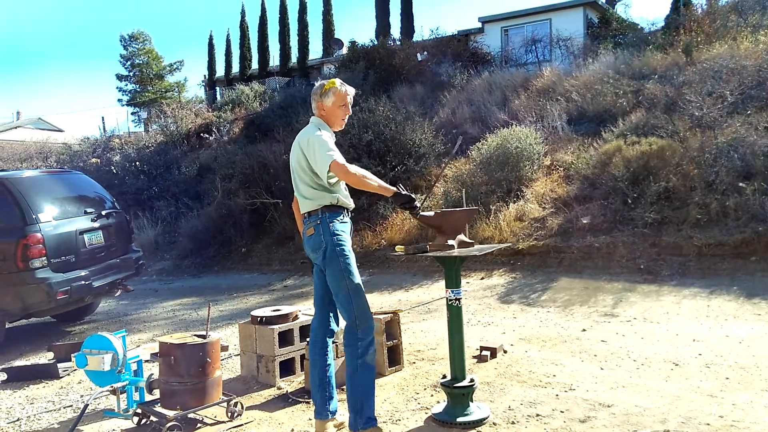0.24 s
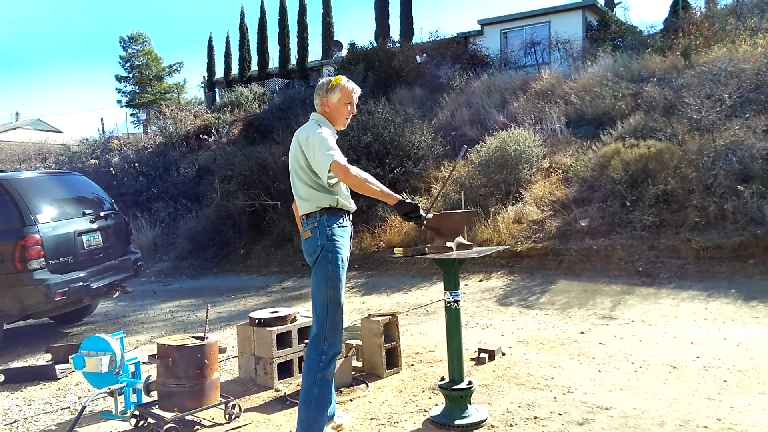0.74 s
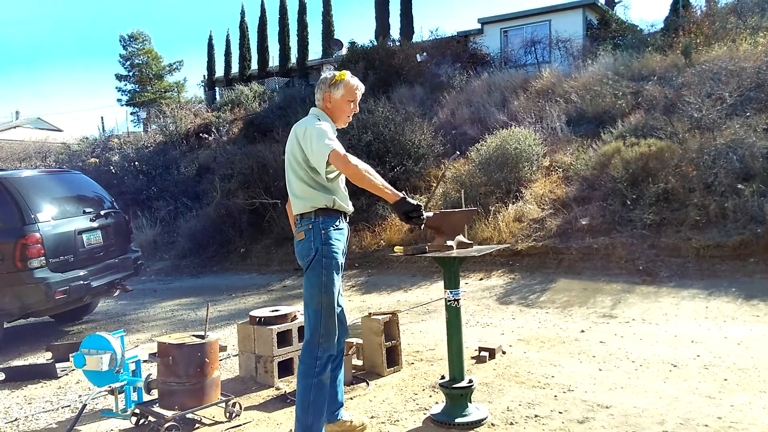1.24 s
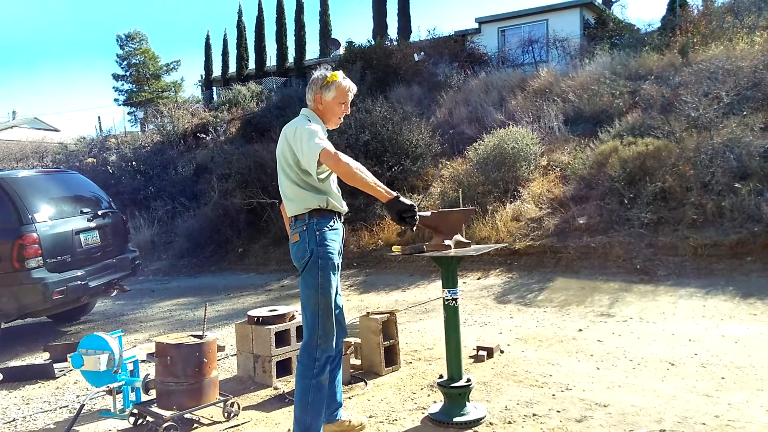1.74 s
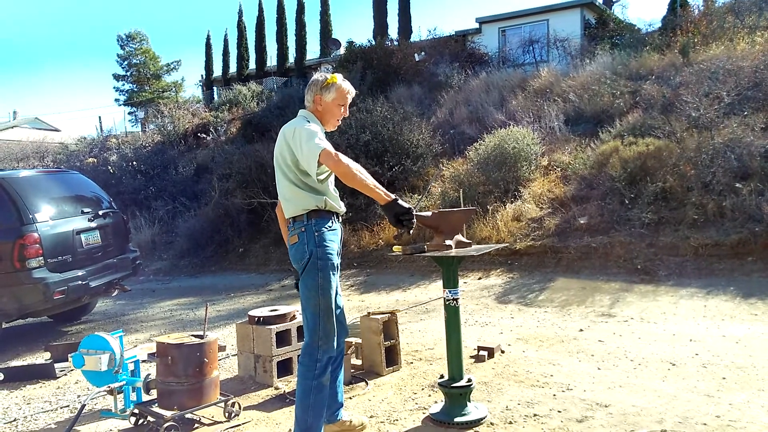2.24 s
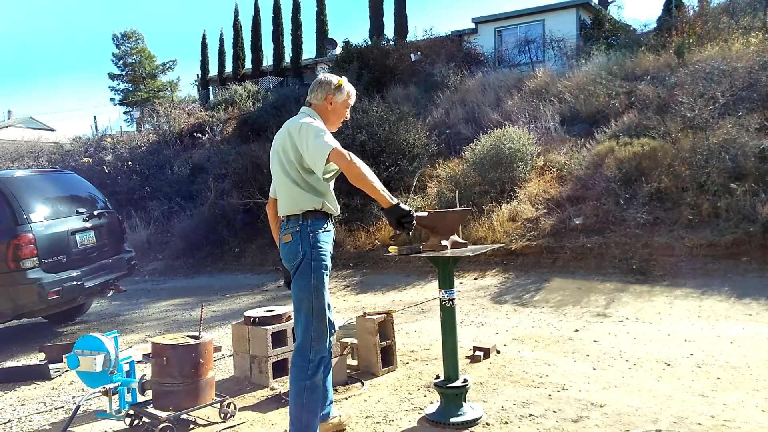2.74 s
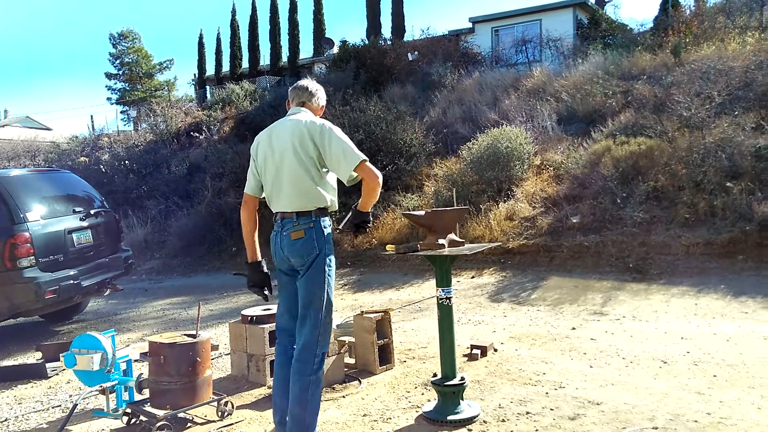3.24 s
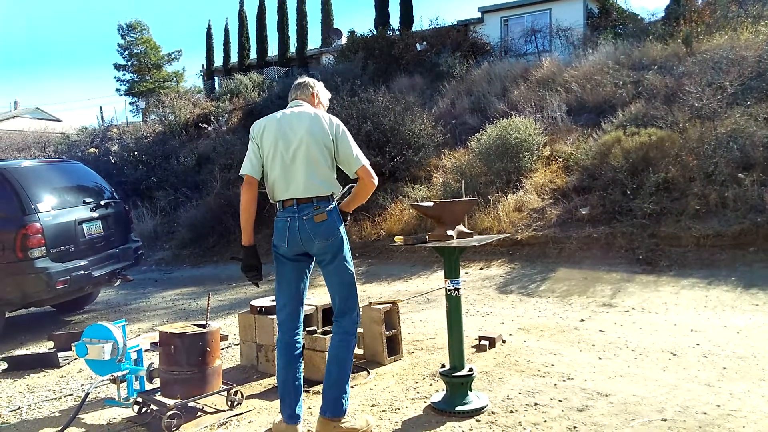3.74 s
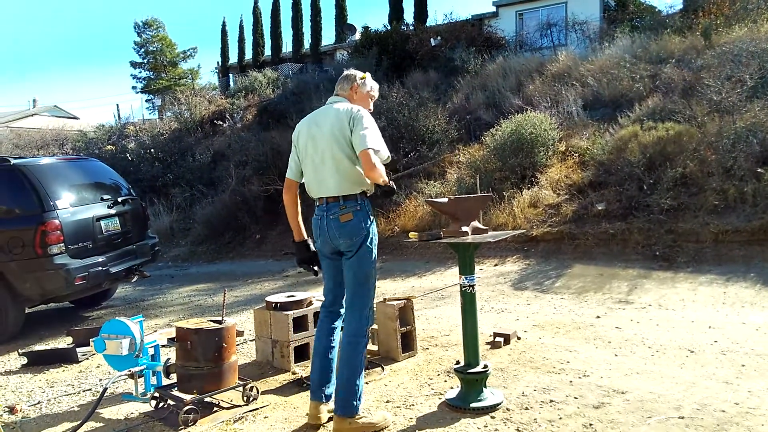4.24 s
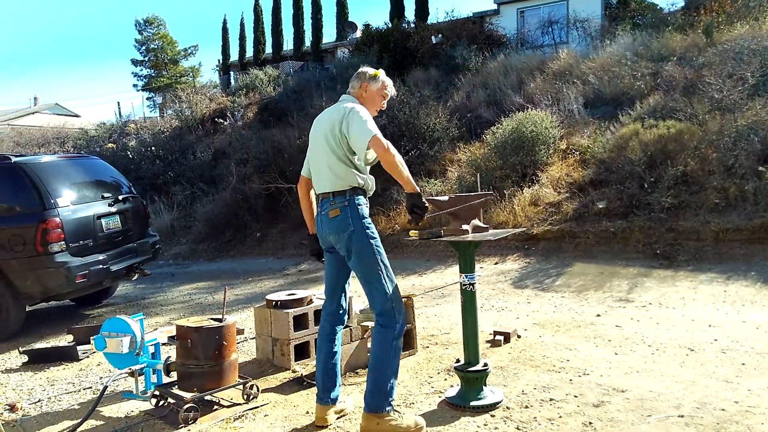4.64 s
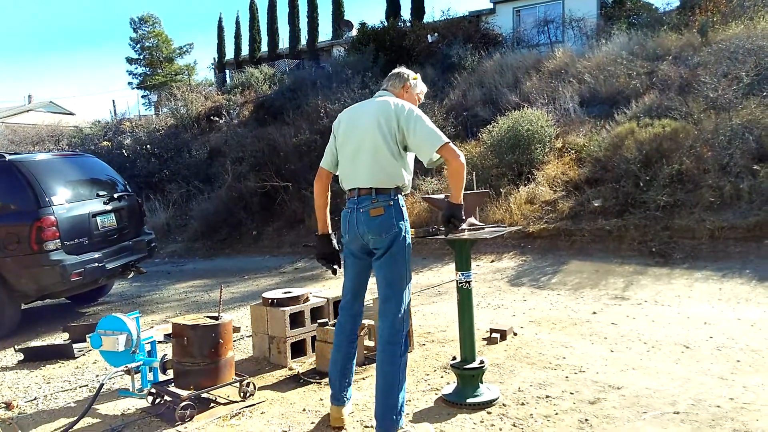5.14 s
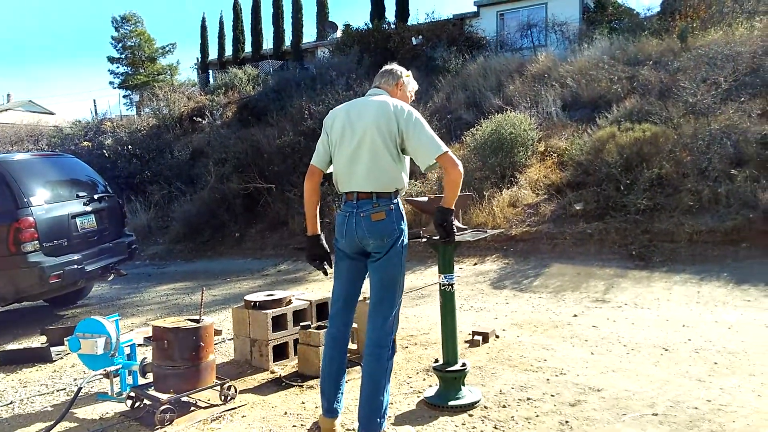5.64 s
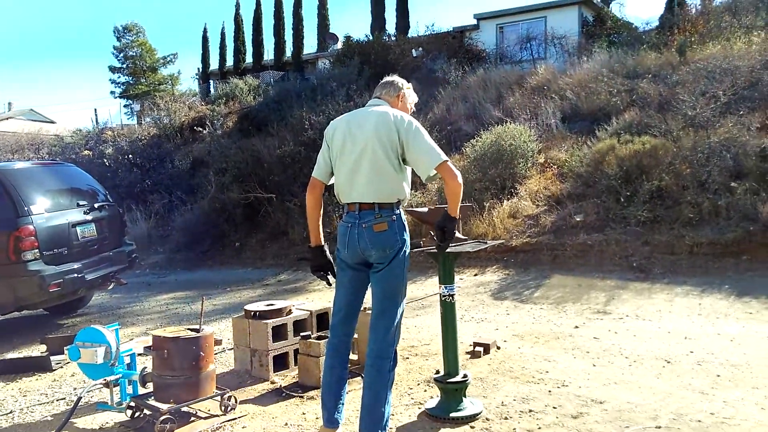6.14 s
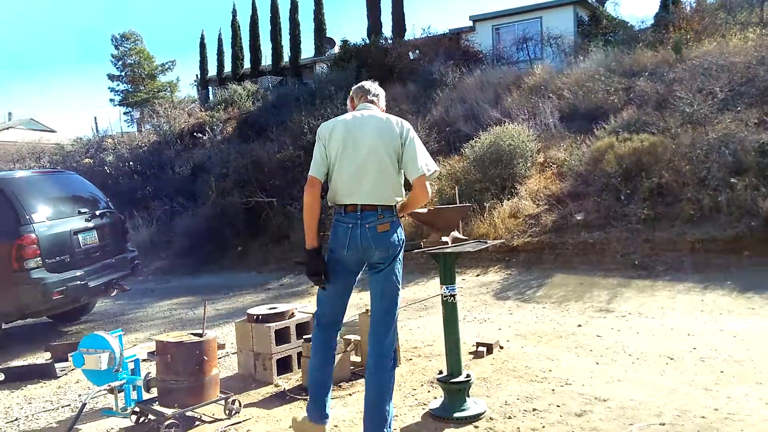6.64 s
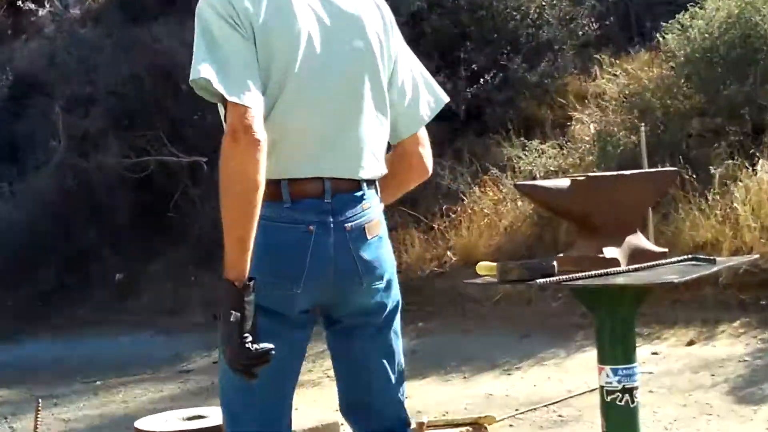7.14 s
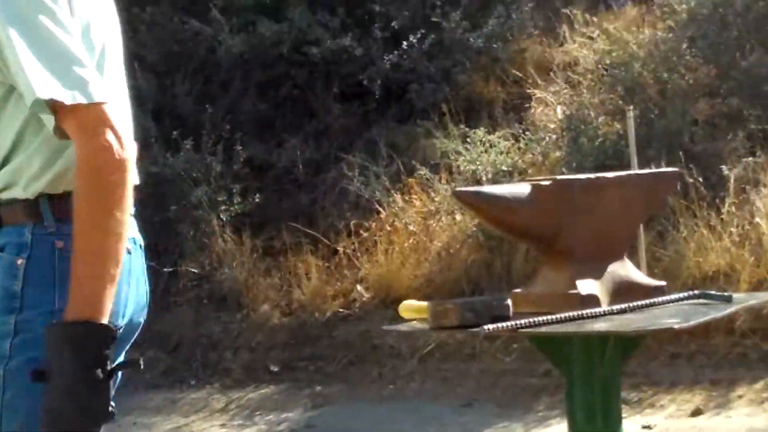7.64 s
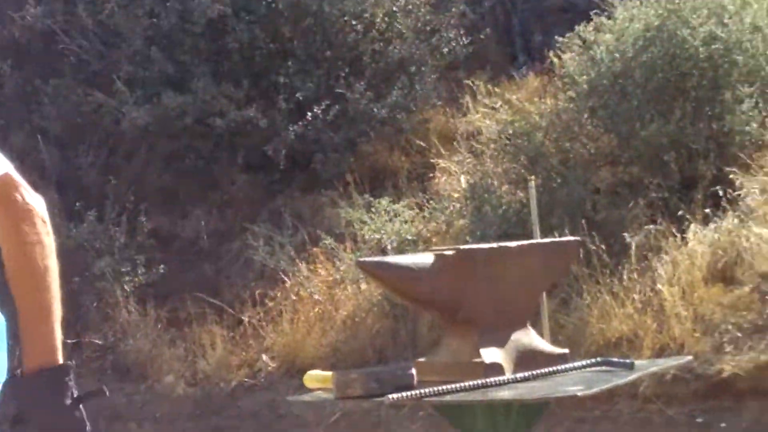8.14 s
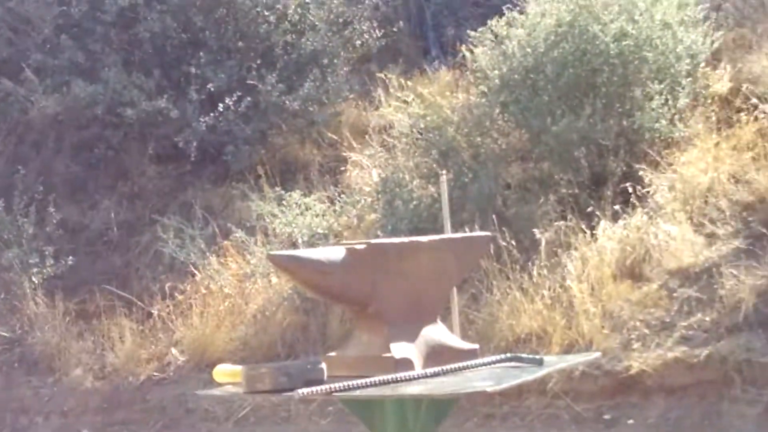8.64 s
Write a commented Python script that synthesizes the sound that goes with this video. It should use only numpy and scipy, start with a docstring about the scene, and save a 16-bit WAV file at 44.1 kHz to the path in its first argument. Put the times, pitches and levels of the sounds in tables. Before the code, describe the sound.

Low fluttering roar of a small forge, faint regular ticking, then two loud steel clanks around lighter knocks, a fine whir and gravel crunch.

```python
"""The blower-fed fire of a small outdoor forge roars steadily in stereo: coloured noise with a wavering level.
Its air pipe sings; the camera's electronics tick faintly, as regular short chirps; an airy hiss lies behind.
A hammer and a bar go down on the steel plate under the anvil, as decaying modes and noise: a clank,
two knocks, a short skid, a louder clank. The camera's gain control ducks the roar after the loud ones;
then, as shaped noise, its zoom whirs and a boot scuffs the gravel, among small ticks and knocks."""
import sys
import numpy as np
from scipy import signal
from scipy.fft import rfft, irfft
from scipy.io import wavfile
from scipy.ndimage import uniform_filter1d

SR = 44100
rng = np.random.default_rng(int(sys.argv[2]) if len(sys.argv) > 2 else 0)


def waveform_to_disk(signal):
    """Save audio, clipped to [-1, 1], as 16-bit WAV at the path in sys.argv[1]."""
    frames = np.transpose(np.atleast_2d(signal))
    scaled = np.clip(frames, -1, 1) * 32767
    samples = np.round(scaled).astype(np.int16)
    wavfile.write(sys.argv[1], SR, samples)


N = 391608
TIME = np.arange(N) / SR
BINS = np.fft.rfftfreq(N, 1 / SR)


def gain_of(db):
    """Decibels to amplitude."""
    return 10 ** (np.asarray(db) / 20)


def evened(x):
    """Scales to rms 1."""
    return x / np.sqrt(np.mean(x ** 2) + 1e-20)


def read(points, hz):
    """A table read over log frequency."""
    f, value = np.transpose(points)
    return np.interp(np.log(hz + 1), np.log(f + 1), value)


def follow(points):
    """A table read over time."""
    return np.interp(TIME, *np.transpose(points))


def sides(pan_db):
    """Left and right gains for a level difference, positive to the left."""
    return gain_of(np.array([[.5], [-.5]]) * pan_db)


def add(mix, s, sound):
    """Mixes a stereo sound in at time s."""
    part = mix[:, round(s * SR):][:, :sound.shape[1]]
    part += sound[:, :part.shape[1]]


def bump(hz, centre, width):
    """Bell shape of a resonance, height 1."""
    return 1 / (1 + (2 * (hz - centre) / width) ** 2)


def band_db(hz, low_hz, top_hz):
    """A pass band that falls 12 dB per octave beyond each edge."""
    above = 1 + (hz / top_hz) ** 4
    below = 1 + (low_hz / (hz + 1)) ** 4
    return -10 * np.log10(above * below)


def ripple(bins, spacing_hz):
    """Random peaks and valleys of rms 1 along frequency, as densely packed resonances make."""
    knots = np.linspace(0, SR / 2, 2000)
    heights = rng.standard_normal(len(knots))
    return evened(np.interp(bins / spacing_hz, np.arange(len(knots)), heights))


def noise(colour_db, same=0):
    """Stereo noise of rms 1 with a given spectrum and left-right likeness."""
    a, b = rfft(rng.standard_normal((2, 2 * (len(colour_db) - 1))))
    same = np.clip(same, -1, 1)
    right = same * a + np.sqrt(1 - same ** 2) * b
    return evened(irfft(np.array([a, right]) * gain_of(colour_db)))


def wander(rate_hz):
    """Slow random drift of rms 1."""
    return evened(irfft(rfft(rng.standard_normal(N)) * np.exp(-(BINS / rate_hz) ** 2)))


def stroke(start_s, length_s, rise_s, fade_s):
    """Envelope of one movement: rises, holds to its end, then dies away."""
    t = TIME - start_s
    return np.clip(t / rise_s, 0, 1) * np.exp(-np.maximum(t - length_s, 0) / fade_s)


# spectrum of the fire: f/Hz, relative level/dB per Hz
ROAR_SPECTRUM = [(25, -38), (38, -42), (58, -13.5), (100, -4), (200, -1.5), (340, 1), (560, -14),
                 (930, -17.5), (1040, -25.5), (1200, -21.5), (1700, -24), (1880, -25), (2150, -20.5),
                 (2500, -43.5)]
# resonances of the fire chamber and air pipe: f/Hz, width/Hz, height/dB
CHAMBER_RESONANCES = [(132.4, 18, 2.5), (172.4, 16.3, 4), (255, 15, 2.5), (395.6, 4.6, 7), (425.3, 14, -10),
                      (452.3, 36, 6.5), (524.5, 22.6, 7.5), (1410, 10, 4.5), (1498, 32, 10), (1694, 48, 10)]
# how alike the fire is at left and right: f/Hz, likeness -1 to 1
ROAR_LIKENESS = [(60, 0.69), (130, 0.82), (330, 0.8), (600, 0.36), (900, 0.94), (1200, 0.66), (1500, -0.79),
                 (2100, -0.91), (2600, -0.84)]
# where the fire lies between the sides: f/Hz, left-right level/dB
ROAR_BALANCE = [(60, 3), (130, 1.5), (260, 1.5), (600, -1), (1000, 2), (1500, -12.5), (2200, -4)]


def fire(level_db=-23.0, flutter_db=1.25, flutter_hz=15.5):
    """Turbulent flame noise coloured by the chamber, fluttering slightly."""
    chamber_db = sum(db * bump(BINS, hz, width) for hz, width, db in CHAMBER_RESONANCES)
    top_fall_db = 45 * np.log2(np.maximum(BINS / 2500, 1))
    colour_db = read(ROAR_SPECTRUM, BINS) + chamber_db - top_fall_db
    roar = noise(colour_db, read(ROAR_LIKENESS, BINS))
    placed = irfft(rfft(roar) * sides(read(ROAR_BALANCE, BINS)))
    return placed * gain_of(level_db + flutter_db * wander(flutter_hz))


# tones that the draught sings in the air pipe: f/Hz, level/dB, depth of swells/dB
PIPE_SONG = [(372.7, -37.5, 5), (450, -39.5, 2)]


def pipe(waver_cents=11, waver_hz=3.48, swell_hz=2.8, pan_db=1.5):
    """The draught sings unsteadily in the pipe: each tone wavers, swells and drops out by itself."""
    out = np.zeros(N)
    for hz, db, swell_db in PIPE_SONG:
        wavering_hz = hz * 2 ** (waver_cents * wander(waver_hz) / 1200)
        turns = np.cumsum(wavering_hz) / SR
        breaks = gain_of(swell_db * np.minimum(wander(swell_hz), 1.2))
        out += gain_of(db) * evened(breaks * np.sin(2 * np.pi * turns))
    return out * sides(pan_db)


# steel landing on the plate: t/s, force/dB, what rings, place on it 0-1, brightness/dB per octave,
# low edge f/Hz, top edge f/Hz, chatter build-up/s, relative clack level/dB
LANDINGS = [(5.3477, 7, "plate", 0, 3, 910, 6100, 0.0041, -15),
            (5.652, -6, "bar", 0.18, 0.5, 500, 3920, 0.0098, 8),
            (5.8008, -9.5, "bar", 0.86, 3, 900, 5500, 0.0014, -0.5),
            (5.939, -5, "plate", 0.9, -2, 600, 4500, 0.0031, 7),
            (5.948, 10.5, "plate", 0.87, 6, 700, 10500, 0.023, -2),
            (5.96, 5, "plate", 1, -2, 850, 8100, 0.0094, 1)]
# hard contacts as the steel bounces within a clank: t/s, level/dB
HARD_CONTACTS = [(5.35, -0.5), (5.3528, -9), (5.361, -13), (5.3715, -12), (5.374, -10), (5.6595, -17),
                 (5.949, -4), (5.9578, -8), (5.9755, -7), (6.012, -5)]
# modes of the plate: f/Hz, level/dB struck at place 0, level/dB struck at place 1,
# left-right level/dB, left lead/rad, t60/s before the damping factor
PLATE_MODES = [(993, -26, -33, -1, -0.4, 0.5), (1094, -39, -33, -1, 0.1, 0.52),
               (1149, -30, -28, -3, -0.2, 0.36), (1191, -28, -29, -2, -0.0, 0.36),
               (1208, -38, -27, -2, -0.0, 0.36), (1326, -28, -34, -1, 0.1, 0.4),
               (1389, -39, -36, -1, 0.3, 0.53), (1451, -35, -28, -10, 0.9, 0.36),
               (1531, -35, -36, -3, 0.4, 0.54), (1559, -37, -31, -10, 0.8, 0.45),
               (1663, -37, -35, -2, 0.8, 0.49), (1730, -33, -35, 1, 0.8, 0.65),
               (1806, -32, -26, -3, 1.7, 0.42), (1975, -27, -30, 4, 0.8, 0.65),
               (2046, -33, -30, 2, 0.6, 0.65), (2129, -38, -36, 2, 1.6, 0.6),
               (2187, -25, -34, 3, 0.7, 0.44), (2327, -38, -39, 0, 1.4, 0.65),
               (2500, -34, -33, -5, 1.1, 0.65), (2649, -31, -37, 2, -0.9, 0.6),
               (2698, -33, -32, -1, 0.8, 0.65), (2767, -31, -24, -7, 0.1, 0.39),
               (2860, -34, -34, -1, 0.5, 0.63), (2947, -43, -33, -4, 1.8, 0.57),
               (3070, -30, -33, -4, 0.9, 0.57), (3146, -30, -38, -5, 0.0, 0.36),
               (3373, -40, -25, -8, 1.2, 0.37), (3403, -40, -42, -6, 1.0, 0.65),
               (3484, -47, -37, 10, 1.3, 0.65), (3616, -40, -40, -2, 0.9, 0.54),
               (3713, -41, -49, -10, -0.7, 0.65), (3954, -46, -41, -5, -0.6, 0.54),
               (3991, -37, -36, -5, 2.8, 0.65), (4038, -39, -40, -2, 0.8, 0.54),
               (4104, -38, -36, -1, 1.4, 0.36), (4256, -40, -43, -4, 2.1, 0.65),
               (4478, -38, -45, -2, 1.3, 0.6), (4722, -48, -40, 7, 0.8, 0.65),
               (4980, -42, -58, -10, 1.6, 0.58), (5147, -48, -41, -5, 1.5, 0.36),
               (5270, -47, -42, -5, 1.4, 0.36), (5728, -66, -60, -1, -1.6, 0.65),
               (5810, -57, -51, 0, -0.1, 0.65), (6237, -70, -59, -10, -0.7, 0.65),
               (6536, -62, -52, -5, -0.8, 0.65), (7072, -62, -48, -10, 1.6, 0.48),
               (7936, -65, -53, -10, 2.7, 0.48)]
# modes of the loose bar: same columns as the plate
BAR_MODES = [(1188, -32, -24, -4, -0.3, 0.55), (1298, -32, -24, -6, -0.1, 0.35),
             (1334, -29, -33, -4, 0.4, 0.45), (1490, -27, -33, -5, 0.8, 0.45),
             (1599, -24, -40, -3, 0.6, 0.36), (1880, -38, -27, -2, 1.2, 0.55),
             (1975, -32, -17, 10, 1.0, 0.6), (2030, -24, -34, 0, 0.8, 0.3), (2110, -22, -28, -2, 1.4, 0.3),
             (2261, -17, -37, -5, 0.4, 0.3), (2684, -22, -33, -3, 0.7, 0.33),
             (2772, -19, -36, -5, 0.3, 0.25), (2848, -24, -34, -8, 1.0, 0.33), (3144, -29, -39, -5, 0, 0.3),
             (3247, -46, -30, 10, 1.8, 0.3), (3405, -29, -34, -10, -0.3, 0.45),
             (3623, -28, -42, -3, -0.2, 0.45), (3989, -42, -24, -5, 1.2, 0.2),
             (4258, -42, -33, -4, 1.2, 0.65), (4330, -38, -25, -7, 0.2, 0.3)]


def plate():
    """Clanks ring the plate, light knocks ring the bar; each wakes its own share of weak resonances."""
    bins = np.fft.rfftfreq(SR, 1 / SR)
    shared = ripple(bins, 22)
    depth_db = read([(1000, 3), (4000, 5), (7000, 6)], bins)
    bodies = {}
    for name, modes in (("plate", PLATE_MODES), ("bar", BAR_MODES)):
        bodies[name] = (modes, rng.standard_normal((len(modes), 3)))
    out = np.zeros((2, N))
    for s, force_db, body, place, *contact in LANDINGS:
        peaks = depth_db * np.minimum(.7 * shared + .7 * ripple(bins, 60), 1.2)
        ring = partials(*bodies[body], s, place)
        add(out, s, blow(peaks, ring, force_db, *contact))
    for s, db in HARD_CONTACTS:
        add(out, s, bounce(db))
    return out


def partials(modes, chance, s, place, ring_db=0, damping=1.21, twin_share=0.98, twin_hz=15,
             jolts_per_s=120, jolt_radians=0.45, settle_s=0.05):
    """Ring of one piece of steel; loose contact splits modes into beating pairs and jolts them at first."""
    t, ring = np.arange(SR) / SR, np.zeros((2, SR))
    # jolts grow rarer as the piece settles
    jolts = rng.random(SR) < jolts_per_s / SR * np.exp(-t / settle_s)
    count = np.cumsum(jolts)
    for (hz, db_0, db_1, pan_db, lead, t60), (phase, twin_phase, split) in zip(modes, chance):
        level_db = ring_db + db_0 + place * (db_1 - db_0) - 60 * damping * t / t60
        steps = np.cumsum(rng.standard_normal(size=100))
        slip = uniform_filter1d(steps[np.minimum(count, 99)], size=90)
        angle = 2 * np.pi * (hz * (s + t) + phase) + jolt_radians * slip + np.array([[lead], [0]])
        twin = np.sin(angle + 2 * np.pi * (twin_hz * split * t + twin_phase))
        pair = np.sin(angle) + twin_share * twin
        ring += sides(pan_db) * gain_of(level_db) * pair
    return ring


# crowd of weaker modes: f/Hz, relative level/dB per Hz
CROWD_SPECTRUM = [(250, -42), (550, -7.5), (800, 0.5), (1000, -2), (1500, -2.5), (2050, -2), (2400, -3.5),
                  (3100, -4.5), (4400, -10.5), (5000, -14), (6500, -26), (8000, -29), (11000, -48),
                  (15500, -51)]
# decay of the crowd: f/Hz, t60/s
CROWD_DECAY = [(500, 0.99), (1200, 0.53), (3400, 0.52), (6000, 0.42), (12000, 0.46)]
# how alike the crowd is at left and right: f/Hz, likeness -1 to 1
CROWD_LIKENESS = [(800, 0.9), (1500, 0.66), (2400, 0.31), (3700, -0.18), (5000, 0.34), (8000, 0.018)]


def blow(peaks, ring, force_db, bright_db, low_hz, top_hz, chatter_s, clack_db, crowd_db=-19.5,
         clack_level_db=-16, clack_t60=0.12, clack_tilt_db=-2, pan_db=-2, rattle_db=0.1, rattle_hz=110,
         contact_s=0.00034):
    """Steel chatters on the plate: a short clack, then clear modes over a rattling crowd of weaker ones."""
    t, bins = np.arange(SR) / SR, np.fft.rfftfreq(SR, 1 / SR)
    octaves = np.log2(np.maximum(bins, 500) / 2000)
    colour_db = read(CROWD_SPECTRUM, bins) + bright_db * octaves + band_db(bins, low_hz, top_hz)
    same = read(CROWD_LIKENESS, bins)
    # each frequency of the crowd dies away at its own pace
    hz, frame_s, z = signal.stft(noise(colour_db + peaks, same), SR, nperseg=256)
    fading_db = crowd_db - 60 * frame_s / read(CROWD_DECAY, hz)[:, None]
    crowd = signal.istft(z * gain_of(fading_db), SR)[1][:, :SR]
    clack_fade_db = clack_level_db + clack_db - 60 * t / clack_t60
    clack = noise(colour_db + clack_tilt_db * octaves, same) * gain_of(clack_fade_db)
    drift = irfft(rfft(rng.standard_normal(SR)) * np.exp(-(bins / rattle_hz) ** 2))
    rattle = gain_of(rattle_db * evened(drift))
    # energy builds up for as long as the contact chatters
    build = np.sqrt(1 - np.exp(-t / chatter_s)) * np.minimum(t / contact_s, 1)
    return gain_of(force_db) * build * (ring + rattle * (crowd + clack) * sides(pan_db))


def bounce(db, t60=0.023, rise_s=0.001, low_hz=800, top_hz=4200, pan_db=-1):
    """One hard contact: a crack of a few milliseconds."""
    t, bins = np.arange(4096) / SR, np.fft.rfftfreq(4096, 1 / SR)
    colour_db = read(CROWD_SPECTRUM, bins) + band_db(bins, low_hz, top_hz)
    crack = noise(colour_db, read(CROWD_LIKENESS, bins))
    return crack * (1 - np.exp(-(t / rise_s) ** 2)) * gain_of(db - 60 * t / t60) * sides(pan_db)


def splash(low_hz=6000, top_hz=11000, level_db=-41, t60=0.028, pan_db=-3):
    """The bright splash of steel meeting steel at the first touch of every blow."""
    out, t, bins = np.zeros((2, N)), np.arange(SR) / SR, np.fft.rfftfreq(SR, 1 / SR)
    for s, force_db, *_ in LANDINGS:
        add(out, s, noise(band_db(bins, low_hz, top_hz)) * gain_of(level_db + force_db - 60 * t / t60))
    return out * sides(pan_db)


def rebounds(first_s=0.032, gap_s=0.024, shrink=0.85, start_db=-24, fall_db_per_s=120, count=9):
    """After each blow the loose steel taps on unevenly, on average faster and always more lightly."""
    out = np.zeros((2, N))
    for s, force_db, *_ in LANDINGS:
        gaps = gap_s * shrink ** np.arange(count) * rng.uniform(.5, 1.5, count)
        for delay in first_s + np.cumsum(gaps):
            add(out, s + delay, bounce(force_db + start_db - fall_db_per_s * delay))
    return out


def skid(start_s=5.868, length_s=0.071, rise_s=0.019, fade_s=0.006, squeal_hz=1495, glide_hz=30,
         jitter_hz=42, squeal_db=-34, rasp_db=-31.5, judder_db=2, judder_hz=120):
    """The bar slides over the plate, sticking and slipping: a juddering squeal over a dull rasp."""
    rasp_colour_db = read(CROWD_SPECTRUM, BINS) + 4 * ripple(BINS, 25) + band_db(BINS, 1100, 2400)
    rasp = noise(rasp_colour_db, 0.25)
    progress = np.clip((TIME - start_s) / length_s, 0, 1) - .5
    hz = squeal_hz + glide_hz * progress + jitter_hz * wander(judder_hz)
    # the left side leads by one radian
    squeal = evened(np.sin(2 * np.pi * np.cumsum(hz) / SR + np.array([[1], [0]])))
    grip = stroke(start_s, length_s, rise_s, fade_s) * gain_of(judder_db * wander(judder_hz))
    return (gain_of(rasp_db) * rasp + gain_of(squeal_db) * squeal) * grip


# spectrum of the gravel: f/Hz, relative level/dB per Hz
GRAVEL_SPECTRUM = [(300, 0), (700, 4.5), (1500, 1), (2500, 0), (3300, -4), (3900, -6.5), (5000, -20),
                   (6300, -23.5), (11000, -27), (15500, -40)]
# heel touches, sole grinds, toe settles: start t/s, length/s, level/dB before the sand and stone shares
BOOT_MOVES = [(8.61, 0.006, -34), (8.639, 0.047, -24.5), (8.695, 0.052, -38.5), (8.75, 0.016, -38)]


def boot(grain_db=2.8, pan_db=-1, sand_db=-5, stones_db=-2, snaps_per_s=450, rise_share=0.75, fade_s=0.041):
    """Gravel under a sole: sand grinds, and small stones crack against each other."""
    colour_db = read(GRAVEL_SPECTRUM, BINS) + 3 * ripple(BINS, 70.7)
    sand = noise(colour_db, -0.13) * gain_of(grain_db * wander(180))
    snap_db = 4 * np.minimum(rng.exponential(1, N), 2.2)
    snaps = (rng.random(N) < snaps_per_s / SR) * gain_of(snap_db)
    stones = evened(irfft(rfft(snaps * rng.standard_normal((2, N))) * gain_of(colour_db)))
    pressure = np.zeros(N)
    for s, length, db in BOOT_MOVES:
        pressure += gain_of(db) * stroke(s, length, rise_share * length, fade_s)
    return (gain_of(sand_db) * sand + gain_of(stones_db) * stones) * pressure * sides(pan_db)


# single stones that crack under the boot: t/s, level/dB
STONE_CRACKS = [(8.605, -23), (8.634, -24), (8.65, -27), (8.671, -24), (8.689, -25), (8.776, -27),
                (8.785, -30)]


def cracks(t60=0.046, rise_s=0.0006, pan_db=-1):
    """Single stones snap under the sole, each with a colour of its own."""
    out, t, bins = np.zeros((2, N)), np.arange(4096) / SR, np.fft.rfftfreq(4096, 1 / SR)
    for s, db in STONE_CRACKS:
        snap = noise(read(GRAVEL_SPECTRUM, bins) + 4 * ripple(bins, 294), 0.27)
        add(out, s, snap * np.minimum(t / rise_s, 1) * gain_of(db - 60 * t / t60))
    return out * sides(pan_db)


# runs of the zoom: start t/s, length/s, spin-up/s, level/dB
ZOOM_RUNS = [(6.57, 1, 0.26, -54.5), (7.77, 0.18, 0.028, -57)]


def zoom(pan_db=-6, whir_hz=8400, stop_s=0.094):
    """The fine whir of the camera's zoom, as bright noise, spins up, runs and winds down."""
    colour_db = read([(2500, -34.5), (5000, -36), (6500, 16.0), (11500, 15), (15500, 10)], BINS)
    colour_db = colour_db + 3 * bump(BINS, whir_hz, 630)
    running = sum(gain_of(db) * stroke(s, length, spin_up, stop_s) for s, length, spin_up, db in ZOOM_RUNS)
    return noise(colour_db) * running * sides(pan_db)


# small ticks and knocks: t/s, level/dB, t60/s, resonance f/Hz, resonance height/dB, slope/dB per octave
SMALL_KNOCKS = [(4.310, -23, 0.19, 1500, 12, -26), (4.317, -45, 0.14, 3400, 38, -8),
                (4.324, -39, 0.045, 3570, 32, -6), (4.371, -46, 0.1, 3450, 34, -8),
                (5.5574, -27.5, 0.02, 8850, 23, -3), (5.566, -44, 0.18, 8500, 16, -3),
                (6.5896, -13.5, 0.015, 4800, 8.5, -15.5), (7.513, -41, 0.084, 11500, 12, -5),
                (7.652, -7, 0.021, 404, 16, -36), (7.865, -43, 0.11, 12000, 12, 3),
                (7.8678, -16.5, 0.027, 1820, 16, -41), (8.704, -28.5, 0.21, 10000, 6, -11)]


def clicks(pan_db=-2):
    """Ticks and knocks around the stand and on the camera; each builds up in one cycle of its resonance."""
    out, t, bins = np.zeros((2, N)), np.arange(SR) / SR, np.fft.rfftfreq(SR, 1 / SR)
    bass_cut_db = read([(40, -35), (200, 0)], bins)
    for s, db, t60, hz, height_db, slope_db in SMALL_KNOCKS:
        colour_db = height_db * bump(bins, hz, hz / 2) + slope_db * np.log2(1 + bins / 2000) + bass_cut_db
        add(out, s, noise(colour_db, 0.45) * np.minimum(t * hz, 1) * gain_of(db - 60 * t / t60))
    return out * sides(pan_db)


# course of the camera's ticks, before their swell, waver and level setting: t/s, level/dB
TICK_COURSE = [(0.03, -45), (0.23, -40), (0.34, -45), (0.74, -42.5), (0.85, -49), (1.05, -48),
               (1.25, -40.5), (1.56, -45.5), (2.28, -46), (2.38, -62), (2.48, -47), (2.79, -49),
               (2.99, -39), (3.19, -45), (3.3, -40.5), (3.7, -47.5), (3.81, -40), (3.91, -47.5),
               (4.35, -42.5), (4.66, -47.5), (5.17, -57), (5.27, -44), (6.29, -51), (6.39, -40), (6.5, -44),
               (6.7, -36.5), (7.15, -39), (7.3, -39.5), (7.62, -33), (7.72, -37), (8.23, -37.5),
               (8.33, -36), (8.84, -36.5)]


def tick_db(swell_db=3, swell_at_s=0.12, swell_hz=2.513, waver_db=2.1, waver_hz=6.1):
    """Level of the camera ticks: it swells and sinks in a slow even cycle and wavers a little."""
    cycle = np.cos(2 * np.pi * swell_hz * (TIME - swell_at_s))
    return follow(TICK_COURSE) + swell_db * cycle + waver_db * wander(waver_hz)


def camera_ticks(tick_rate_hz=29.381, chirp_hz=3350, length_s=0.0012, level_db=-1.0, pan_db=5.5,
                 uneven_db=0.75, right_lead_radians=1.0):
    """A faint, regular tick from the camera's electronics: tone bursts of about two milliseconds."""
    ticks = (TIME - .0288) * tick_rate_hz + .5
    tick = np.floor(ticks).astype(int) + 1
    # every tick draws its own loudness, phase and pitch
    size, phase, detune = rng.standard_normal((tick.max() + 1, 3))[tick].T
    t = (ticks % 1 - .5) / tick_rate_hz
    cycles = (chirp_hz + 40 * detune) * t + phase
    angle = 2 * np.pi * cycles + np.array([[0], [right_lead_radians]])
    peak_db = level_db + tick_db() + uneven_db * size
    swell = np.exp(-(t / length_s) ** 2) * gain_of(peak_db)
    return swell * np.cos(angle) * sides(pan_db)


def tick_hiss(level_db=-18, low_hz=2900, top_hz=3900, pan_db=2):
    """A soft band of hiss around the camera ticks, louder when they are loud."""
    band = noise(2 * band_db(BINS, low_hz, top_hz))
    return band * gain_of(level_db + follow(TICK_COURSE)) * sides(pan_db)


# spectrum of the faint airy hiss: f/Hz, relative level/dB per Hz
HISS_SPECTRUM = [(2000, -8), (2800, 13.5), (3300, 12), (4000, 3.5), (5000, 6), (5600, 2.5), (6500, 0),
                 (8500, 1.5), (10000, -0.5), (15000, -2.5)]
# course of the hiss, before its waver and level setting: t/s, level/dB
HISS_COURSE = [(0, -63), (0.6, -60.5), (1.55, -61.5), (2.75, -59.5), (2.89, -54.5), (3.05, -61.5),
               (3.7, -57.5), (4.5, -60.5), (4.78, -66), (4.96, -58), (5.15, -65), (5.3, -54.5), (8.2, -65),
               (8.5, -59)]
# how alike the hiss is at left and right: f/Hz, likeness -1 to 1
HISS_LIKENESS = [(3000, 0.0063), (4200, -0.4), (5000, 0.29), (6500, -0.24), (8500, 0.17), (10000, 0.025),
                 (14000, 0.028)]


def hiss(level_db=5.5, waver_db=0.9, waver_hz=4.2, pan_db=-4.5):
    """Faint airy hiss in the background: coloured noise that wavers."""
    air = noise(read(HISS_SPECTRUM, BINS), read(HISS_LIKENESS, BINS))
    course_db = level_db + follow(HISS_COURSE) + waver_db * wander(waver_hz)
    return air * gain_of(course_db) * sides(pan_db)


def scene():
    """The forge, the tools on the plate, the camera and the small sounds around them."""
    forge = fire() + pipe() + hiss()
    camera = camera_ticks() + tick_hiss() + zoom()
    steel = plate() + splash() + rebounds() + skid()
    return forge + camera + steel + clicks() + boot() + cracks()


def widen(x, delay_s=.000403):
    """Stereo widening: each side loses a delayed share of the other, which combs mid and side in turn."""
    share = read([(500, 0.094), (900, 0.44), (3800, 0.67), (5000, 0.64), (5600, 0.34), (15000, 0.13)], BINS)
    share = np.clip(share, 0, 1)
    cross = share * np.exp(-2j * np.pi * BINS * delay_s)
    z = rfft(x)
    return irfft((z - cross * z[::-1]) / np.sqrt(1 + share ** 2))


def record(dry, threshold_db=-17.0, slope=0.83, recovery_db_per_s=11, attack_s=0.0089, edge_hz=15600):
    """Stereo widening; gain control that drops quickly on the clanks and recovers slowly; the band limit."""
    wide = widen(dry)
    power_db = 10 * np.log10(abs(uniform_filter1d((wide ** 2).mean(0), size=900)) + 1e-12)
    # the detector holds each peak and lets it sink at the recovery rate
    fall = TIME * recovery_db_per_s
    held_db = np.maximum.accumulate(power_db + fall) - fall
    over_db = np.maximum(held_db - threshold_db, 0)
    keep = np.exp(-1 / (attack_s * SR))
    duck_db = slope * signal.lfilter([1 - keep], [1, -keep], over_db)
    ducked = wide / gain_of(duck_db)
    # only the very highest peaks are rounded off
    ducked = ducked / (1 + ducked ** 8) ** (1 / 8)
    band_limit = signal.firwin(511, edge_hz, window=("kaiser", 9), fs=SR)
    return signal.oaconvolve(ducked, band_limit[None], "same")


dry = scene()
out = record(dry)
waveform_to_disk(out)
```